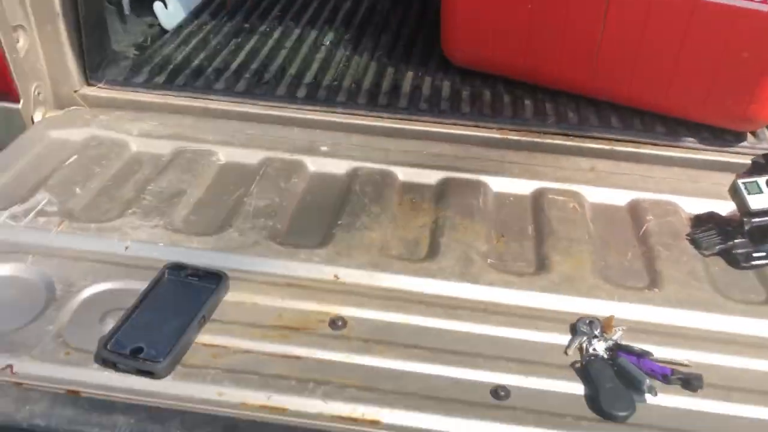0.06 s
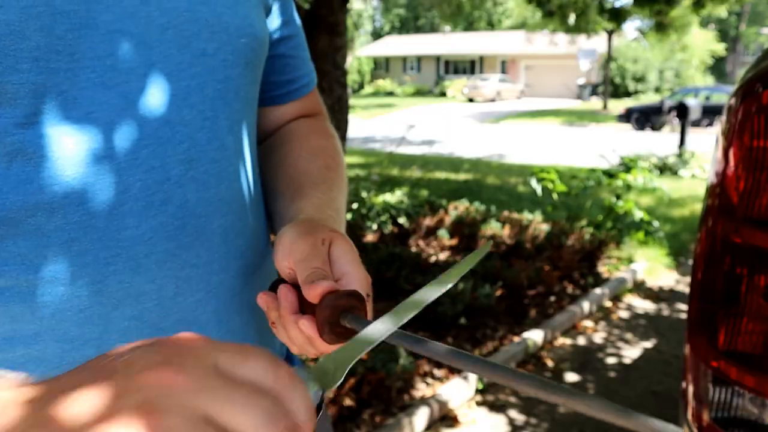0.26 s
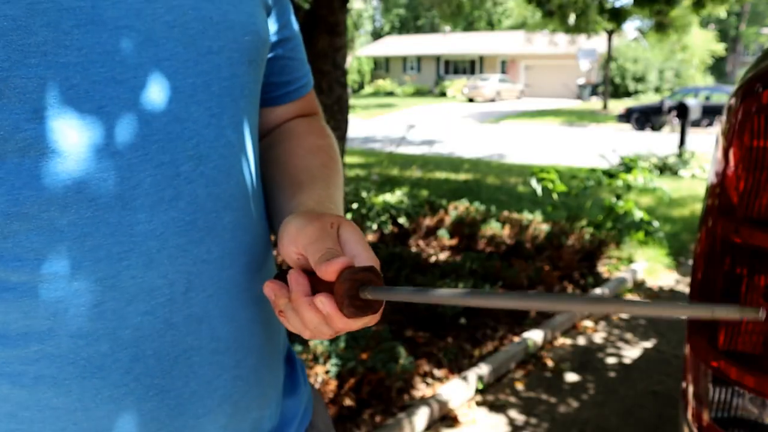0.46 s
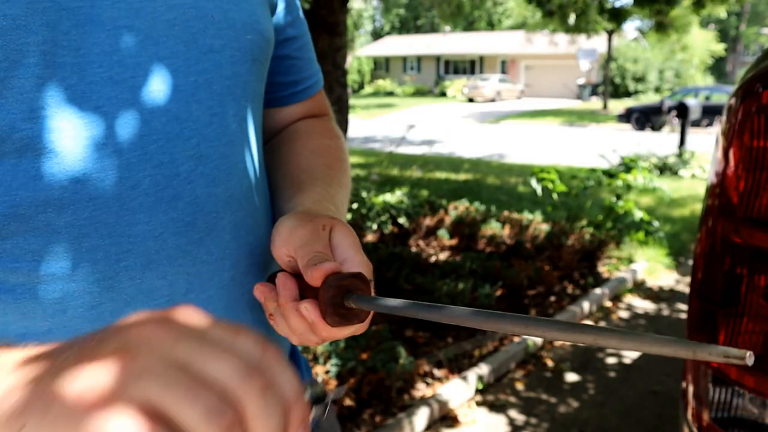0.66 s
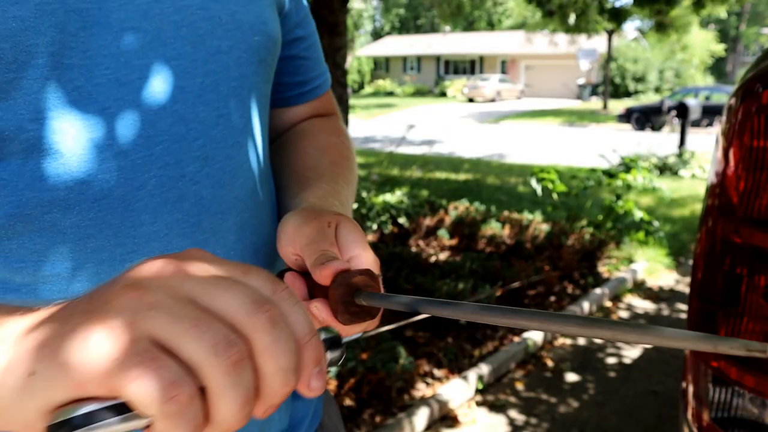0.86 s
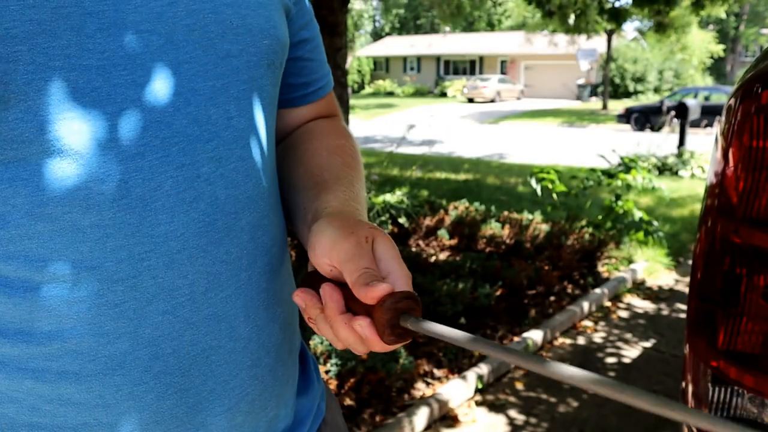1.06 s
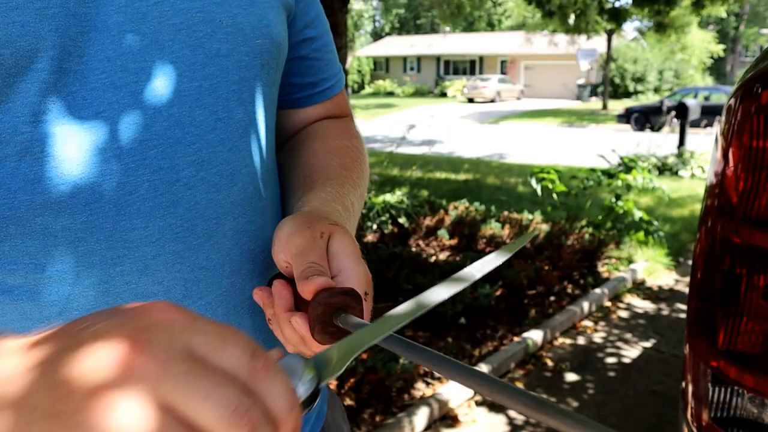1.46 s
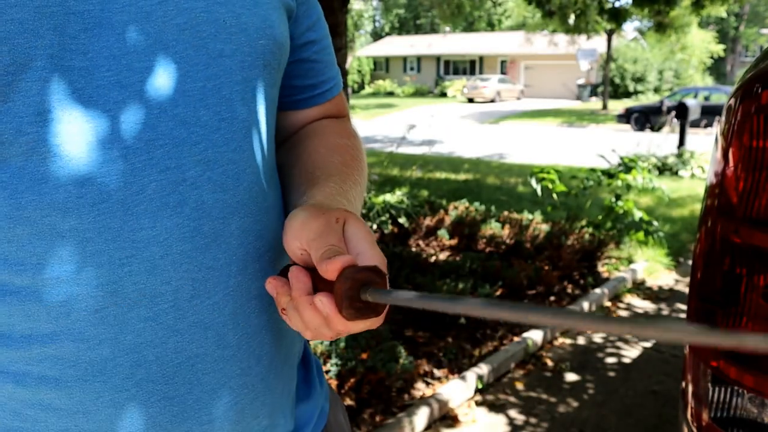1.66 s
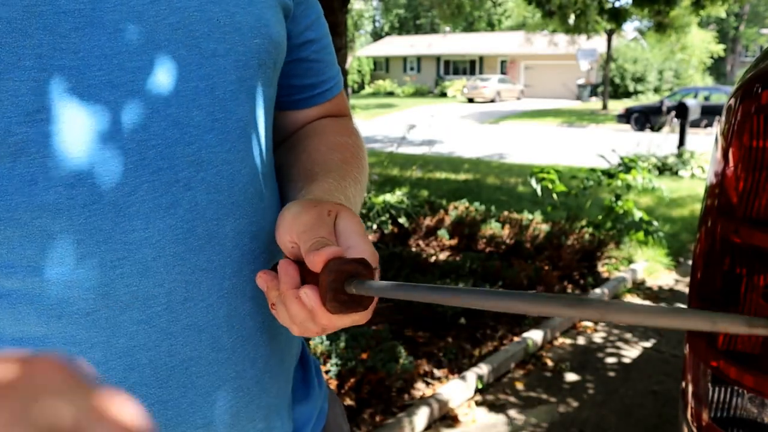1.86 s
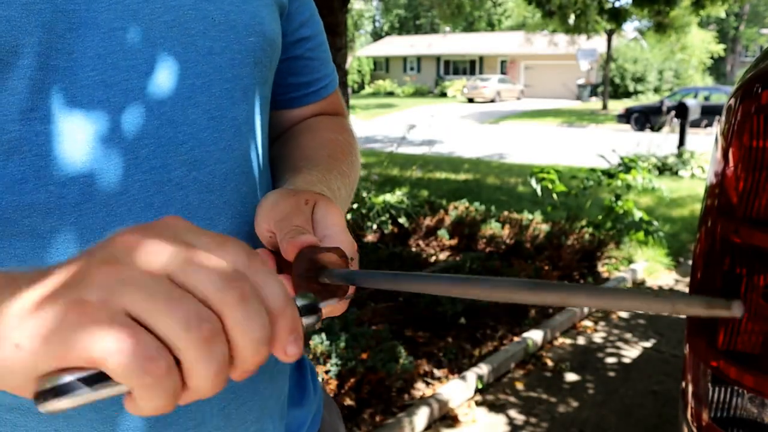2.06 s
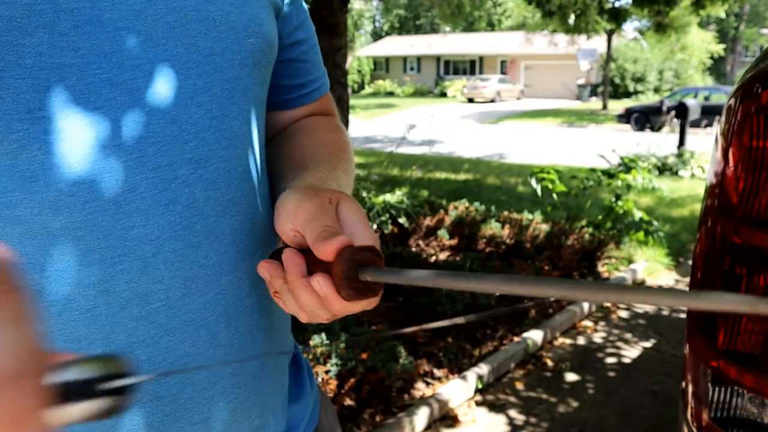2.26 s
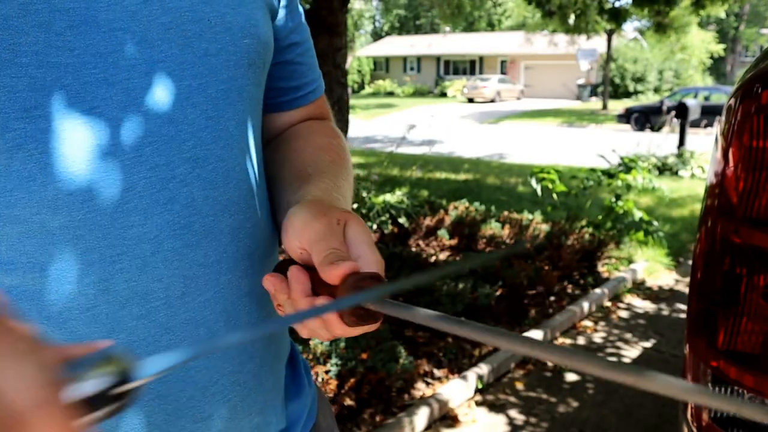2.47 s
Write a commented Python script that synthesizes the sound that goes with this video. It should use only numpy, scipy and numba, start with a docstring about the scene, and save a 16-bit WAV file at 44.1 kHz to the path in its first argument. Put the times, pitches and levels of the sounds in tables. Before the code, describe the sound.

A knife scrapes along a honing steel four times, bright and ringing, over low outdoor rumble.

```python
"""A knife is drawn four times along a honing steel, close by, outdoors over a low rumble.
The blade lands with a bounce, then grit and friction ring it on both sides of the sliding contact:
the shortening side rises in pitch, the lengthening side falls, and each mode flares as it crosses
a fixed resonance. The edge catches in short shrieks; when the tip slips off, the steel rings freely.
Two soft, hollow whooshes pass between strokes."""
import sys
import numpy as np
from scipy import signal
from scipy.fft import rfft, irfft
from scipy.io import wavfile
from numba import njit

SR = 44100
rng = np.random.default_rng(int(sys.argv[2]) if len(sys.argv) > 2 else 0)


def pcm_store(signal):
    """Save signal as 16-bit PCM."""
    levels = np.round(np.clip(np.atleast_2d(signal), -1, 1) * 32767)
    wavfile.write(sys.argv[1], SR, levels.astype(np.int16).T)


N = 114660
TOP_HZ = 16100

# heel, middle, belly, tip (position [share of blade])
MARKS = [0, .38, .83, 1]
# shortening side (frequency at heel [Hz], width [Hz], rasp [dB], squeal [dB])
RISING_MODES = [(1257, 40, -2.5, -5), (3122, 90, 0, -0.5), (4747, 98, 0, -6), (6415, 110, -5.5, 0.5),
                (8150, 120, -4, -5.5), (9480, 190, -5.5, -18), (11060, 230, -9, -11.5)]
# lengthening side (frequency at heel [Hz], width [Hz], rasp [dB], squeal [dB], period growth [ratio])
FALLING_MODES = [(4102.5, 65, -7, -6.5, .62), (5466, 40, -8.5, -13, 0.98), (7060, 220, -7, -6.5, 3.316),
                 (11170, 140, -2.5, -6.5, 2.7), (13570, 380, -3, -11, 1.7), (15100, 110, -9, -7.5, .9)]
# fixed resonances of knife and steel in contact (frequency [Hz], width [Hz], gain [dB])
BODY_MODES = [(1290, 130, -10), (1770, 160, -13), (2380, 160, -7), (3150, 150, -1), (3650, 200, 4),
              (4280, 180, 3), (5150, 200, -1), (6150, 260, 0), (7500, 280, 1), (8650, 320, -1),
              (10200, 300, -1), (11600, 300, -2), (13100, 450, -6), (14900, 900, -11)]
# path around the fixed resonances (frequency [Hz], gain [dB])
BYPASS_EQ = [(500, -36), (1200, -4), (2200, 11.5), (3500, 17.5), (8000, 16), (12000, 7), (16000, -12.5)]
# colour of scrape and landing (frequency [Hz], gain [dB])
CONTACT_EQ = [(400, -12), (1200, -1), (2000, 1.5), (2480, 2.5), (2750, -5.5), (3100, -2), (8000, 0.5),
              (16000, 2.5)]
def stroke(times, forces_db, tip_treble_db):
    """One draw, heel to tip: grit and friction drive gliding modes through the fixed resonances."""
    attack_s, release_s = .0023, .0042
    chatter_db, chatter_per_s, grit_per_s = 1.02, 219.9, 12000
    rasp_base_db, squeal_base_db, treble_hz = -31.5, -30.5, 6400
    n = SR // 3
    t = times[0] + np.arange(n) / SR
    place = np.interp(t, times, MARKS)
    force = undb(np.interp(t, times, forces_db) + chatter_db * wander(chatter_per_s, n))
    force *= np.minimum((t - times[0]) / attack_s, 1)
    force *= np.exp(-np.maximum(t - times[-1], 0) / release_s)
    grain_sizes = undb(2 * np.minimum(rng.exponential(size=n), 5))
    grit = force * unit(rng.standard_normal(n) * grain_sizes * (rng.random(n) < grit_per_s / SR))
    bite = np.minimum(place / .25, 1)  # the edge takes hold after the heel

    def mode(hz, width_hz, rasp_db, squeal_db):
        """One mode rasps and sings; the contact wanders and drops out, most near the tip."""
        hz = hz * (1 + .075 * place ** 2 * wander(110, n))
        rasp = undb(rasp_base_db + rasp_db) * band(grit, hz, width_hz) * np.sqrt(SR / np.pi / width_hz)
        top_fade = np.clip((TOP_HZ - hz) / 1000, 0, 1)
        dropouts = undb(5 * place * np.minimum(2 * wander(140, n), .5))
        tone = bite * force * undb(squeal_base_db + squeal_db) * squeal(hz)
        return top_fade * dropouts * (rasp + tone)

    scrape = grit * undb(-31 + 8.5 * (place - .5))
    shortening = np.maximum(1 - place ** 2, .05)
    rising = sum(mode(hz / shortening, *rest) for hz, *rest in RISING_MODES)
    falling = sum(mode(hz / (1 + growth * place ** 2), *rest) for hz, *rest, growth in FALLING_MODES)
    blade = scrape + shortening ** .22 * rising + bite * falling  # a shorter length rings less
    body = bank(blade, BODY_MODES) + undb(-18) * colour(blade, BYPASS_EQ)
    heel_rub = undb(-19.5) * np.exp(-place / .239) * steep_band(grit, hz=1670, width_hz=1360)
    tip_grit = undb(-29) * place ** 3.2 * band(grit, hz=11100, width_hz=7000)
    sound = colour(body, CONTACT_EQ) + heel_rub + tip_grit
    low = signal.sosfiltfilt(signal.butter(2, treble_hz, fs=SR, output="sos"), sound)
    return low + (sound - low) * undb(tip_treble_db + 6.5 * (place - 1))


def squeal(hz):
    """Friction sings in a gliding mode, clinging to each fixed resonance, then jumping to the next."""
    pull, lock_range_hz, flutter_db = .45, 330, 2.5
    body_hz = np.array(BODY_MODES)[:, 0]
    offset_hz = body_hz[np.argmin(np.abs(hz[:, None] - body_hz), axis=1)] - hz
    sung_hz = (hz + pull * offset_hz) * (1 + .012 * wander(698, len(hz)))
    return sine(sung_hz) * undb(flutter_db * wander(170, len(hz))) * bell(offset_hz, lock_range_hz)


# landing resonances (frequency [Hz], width [Hz], gain [dB])
KNOCK_MODES = [(1250, 80, -14), (1770, 110, -12), (3080, 120, 0), (3300, 150, -1), (3630, 120, -6),
               (4400, 300, -13), (5000, 200, -10), (5800, 150, -15), (6900, 300, -16), (8500, 350, -16),
               (9900, 400, -16), (11200, 500, -23)]
def landing():
    """The blade knocks on the steel."""
    hit = burst(decay_s=.0048)
    return colour(bank(hit, KNOCK_MODES) + undb(-30) * hit, CONTACT_EQ)


# free steel (frequency [Hz], level [dB], T60 [s])
RING_MODES = [(2872, 0, .2), (3575, -11, .18), (4650, -19, .13), (5798, -12, .14), (6272, -20, .1),
              (7030, -25, .13), (7585, -16, .12)]
def free_ring():
    """The released steel rings in decaying modes."""
    t = np.arange(SR // 2) / SR
    return sum(undb(db - 60 * t / t60) * np.sin(2 * np.pi * hz * t) for hz, db, t60 in RING_MODES)


# draws (time at each of the 4 MARKS [s], force at each [dB], treble at tip [dB])
STROKES = [(.209, 0.31, 0.44, 0.48, -6.5, -1.5, -0.5, -1, 1),
           (0.842, 0.93, 1.02, 1.086, -9, -7.5, -4, -15.5, -1),
           (1.458, 1.542, 1.647, 1.6892, -4.5, 1, 2.5, -7.5, -0.96),
           (2.155, 2.2, 2.236, 2.3617, -3.5, -8, -0.5, -17.5, -0.09)]
# landings and bounces (time [s], level [dB])
LANDINGS = [(0.2085, 1), (.219, -3), (0.8259, 0.5), (0.832, -1), (1.4582, 1), (1.4652, 4), (2.144, 0.5),
            (2.149, 0)]
# tip slipping off (time [s], click [dB], ring [dB])
SLIPS = [(.484, -1.5, -6), (1.0598, 3.5, 9.5), (1.686, -18, -9), (2.3284, 6, 0.5)]
def knife():
    """The blade lands, slides, and slips off the steel with a click and a ring."""
    out = np.zeros(N)
    for row in STROKES:
        add(out, stroke(times=row[:4], forces_db=row[4:8], tip_treble_db=row[8]), row[0])
    for at, db in LANDINGS:
        add(out, undb(db - 9.5) * landing(), at)
    for at, click_db, ring_db in SLIPS:
        click = band(burst(decay_s=.0027), hz=6100, width_hz=4670)
        add(out, undb(click_db - 17) * click, at)
        add(out, undb(ring_db - 40.5) * free_ring(), at)
    return out


# edge catches (time [s], half length [s], frequency [Hz], glide [Hz/s], level [dB])
SHRIEKS = [(.299, .012, 3500, 4998, -24), (0.357, 0.013, 4280, 3002.5, -19.5),
           (.418, 0.0068, 3140, 0, -13.5), (0.439, 0.00533, 3780, 70004, -19),
           (.448, 0.00313, 5200, 40017, -18.5), (0.932, 0.011, 3760, 8002, -25),
           (1.02, .007, 3950, 60004.5, -23), (1.526, .008, 3520, 5001, -21),
           (1.5442, .005, 3680, 6008.5, -15), (1.574, .005, 4290, 3999, -21),
           (1.648, 0.0036, 4020, 70004.5, -20.5), (2.2, .018, 3610, 3999.5, -22),
           (2.229, 0.0067, 4400, 4002, -28), (2.269, 0.0057, 3100, 2, -25),
           (2.291, .005, 3900, 79998, -17.5), (1.626, 0.017, 2490, -1, -28), (0.415, 0.0098, 2480, 0, -28)]
def shrieks():
    """Short loud squeals at set times: the edge catches and a mode locks on to a resonance."""
    out, t = np.zeros(N), np.arange(N) / SR
    for at, half_s, hz, hz_per_s, db in SHRIEKS:
        glide_hz = hz_per_s * np.clip(t - at, -2 * half_s, 2 * half_s)
        pitch_hz = (hz + glide_hz) * (1 + .008 * wander(700, N))
        out += undb(db) * bell(t - at, half_s) * sine(pitch_hz)
    return out


def echo(x, level_db=-19.5, t60_s=.2, delay_s=.0054):
    """Faint, short scatter from the surroundings."""
    t = np.arange(SR // 2) / SR
    tail = rng.standard_normal(len(t)) * undb(-60 * t / t60_s) * (t > delay_s)
    tail = band(tail, hz=5700, width_hz=18000)
    return undb(level_db) * signal.fftconvolve(x, tail / np.sqrt(np.sum(tail ** 2)))[:N]


# hollow rushes (time [s], half length [s], level [dB])
WHOOSHES = [(.75, 0.13, -37), (1.93, 0.096, -44.5)]
def whooshes():
    """A soft band of noise rises and fades between strokes."""
    return unit(steep_band(rng.standard_normal(N), hz=546, width_hz=237)) * swell_envelope(WHOOSHES)


# spectra of opening hum, outdoor bed and swells (frequency [Hz], level [dB])
HUM_SPECTRUM = [(20, -21), (90, 3), (230, -0.5), (400, -18.5), (800, -26.5), (1400, -30.5), (2000, -21),
                (2600, -30), (3300, -28.5), (6000, -38), (16000, -46.5)]
OUTDOOR_SPECTRUM = [(20, -24), (45, -15.5), (85, 0.5), (170, -4.5), (300, -8), (600, -8.5), (1300, -10.5),
                    (2000, -23.5), (3200, -32.5), (7000, -39.5), (16000, -45.5)]
SWELL_SPECTRUM = [(40, -21), (100, -5), (170, 1.5), (330, -4), (570, -7), (850, -16), (1500, -22),
                  (3000, -49.5), (16000, -65.5)]
# rumble swells (time [s], half length [s], level [dB])
SWELLS = [(.35, 0.3, -41.5), (0.928, 0.22, -34), (1.9, 0.23, -37)]
# rumble resonances (frequency [Hz], width [Hz], gain [dB])
RUMBLE_MODES = [(81.2, 16, -25.5), (103.5, 14, -32), (147.6, 11.6, -29), (170.5, 5.4, -26),
                (181.9, 9.7, -33), (356.7, 16, -28), (486, 16, -35.5)]
def background(rumble_start_s=.166):
    """A quiet hum, then the scene changes with a tiny tick to an outdoor rumble that swells and sinks."""
    dull_noise = colour(rng.standard_normal(N), [(500, 0), (2000, -14)])
    drone = undb(5) * bank(dull_noise, RUMBLE_MODES)
    bed = undb(-43 + 1.5 * wander(5.788, N)) * noise(OUTDOOR_SPECTRUM)
    swells = swell_envelope(SWELLS) * noise(SWELL_SPECTRUM)
    hum = undb(-45) * noise(HUM_SPECTRUM)
    out = np.where(np.arange(N) / SR < rumble_start_s, hum, bed + swells + drone)
    add(out, undb(-36) * burst(decay_s=.0002), rumble_start_s)
    return out


def undb(db):
    """Decibels to gain."""
    return 10 ** (np.asarray(db) / 20)


def unit(x):
    """Scale to rms 1."""
    return x / np.sqrt(np.mean(x ** 2) + 1e-18)


def sine(hz):
    """Sine following a frequency curve."""
    return np.sin(2 * np.pi * np.cumsum(hz) / SR)


def bell(offset, half_width):
    """Gaussian, 1/e at half_width."""
    return np.exp(-(offset / half_width) ** 2)


def swell_envelope(rows):
    """Sum of bell-shaped swells."""
    t = np.arange(N) / SR
    return sum(undb(db) * bell(t - at, half_s) for at, half_s, db in rows)


@njit
def svf(x, hz, width_hz):
    """State-variable band-pass, gain 1 at its moving centre."""
    y, band_state, low_state = np.empty(len(x)), 0., 0.
    for i in range(len(x)):
        g = np.tan(np.pi * min(hz[i], .47 * SR) / SR)
        damping = np.pi * width_hz / SR * (1 + g * g) / g
        v = (band_state + g * (x[i] + 1e-18 - low_state)) / (1 + g * (g + damping))
        band_state = 2 * v - band_state
        low_state += 2 * g * v
        y[i] = damping * v
    return y


def band(x, hz, width_hz):
    """One resonance, fixed or moving."""
    return svf(x, hz * np.ones(len(x)), float(width_hz))


def steep_band(x, hz, width_hz):
    """Two equal resonances in series."""
    return band(band(x, hz, width_hz), hz, width_hz)


def bank(x, modes):
    """Fixed resonances in parallel."""
    return sum(undb(db) * band(x, hz, width_hz) for hz, width_hz, db in modes)


def colour(x, points):
    """Equalise by (frequency [Hz], gain [dB]) points."""
    hz, db = np.array(points).T
    bins_hz = np.maximum(np.fft.rfftfreq(len(x), 1 / SR), 1)
    return irfft(rfft(x) * undb(np.interp(np.log(bins_hz), np.log(hz), db)), len(x))


def noise(points):
    """Coloured noise, rms 1."""
    return unit(colour(rng.standard_normal(N), points))


def wander(per_s, n):
    """Smooth random curve, spread about 1."""
    knots = rng.standard_normal(4096)
    return 1.2 * np.interp(np.arange(n) / SR * per_s, np.arange(len(knots)), knots)


def burst(decay_s):
    """Short crack of noise."""
    t = np.arange(SR // 10) / SR
    return rng.standard_normal(len(t)) * np.exp(-t / decay_s)


def add(out, x, at_s):
    """Mix x in at a time."""
    i = int(at_s * SR)
    out[i:i + len(x)] += x[:N - i]


def scene():
    """Knife and steel close up, their echo, rumble and whooshes; mono."""
    steel = knife() + shrieks()
    return (steel + echo(steel) + background() + whooshes())[None]


def record(dry):
    """Steep low-pass at TOP_HZ."""
    return signal.sosfilt(signal.ellip(10, .2, 80, TOP_HZ, fs=SR, output="sos"), dry)


dry = scene()
out = record(dry)
pcm_store(out)
```